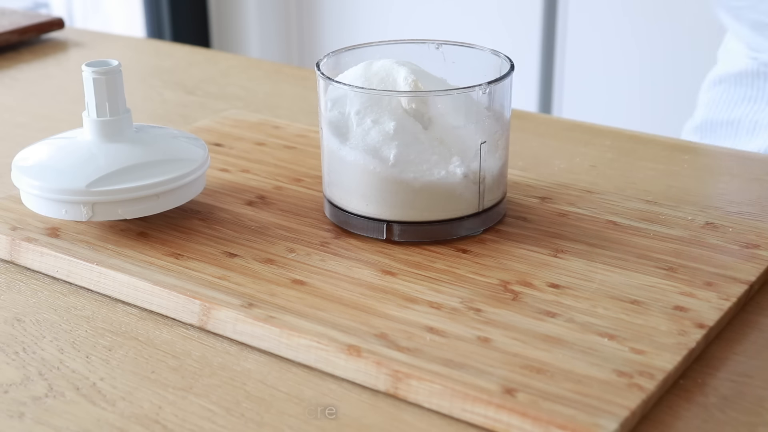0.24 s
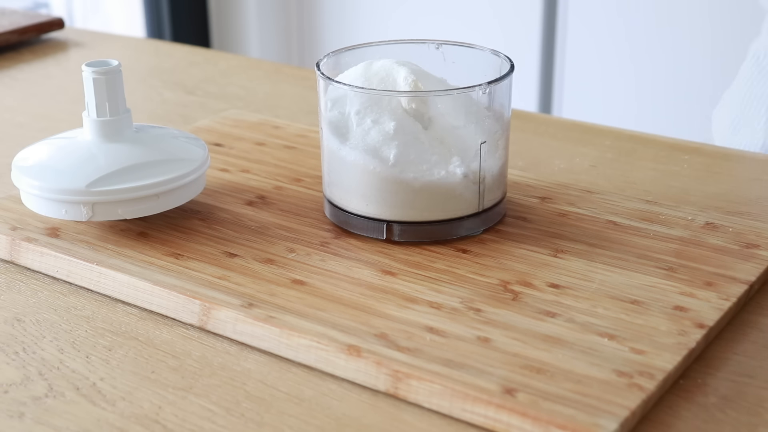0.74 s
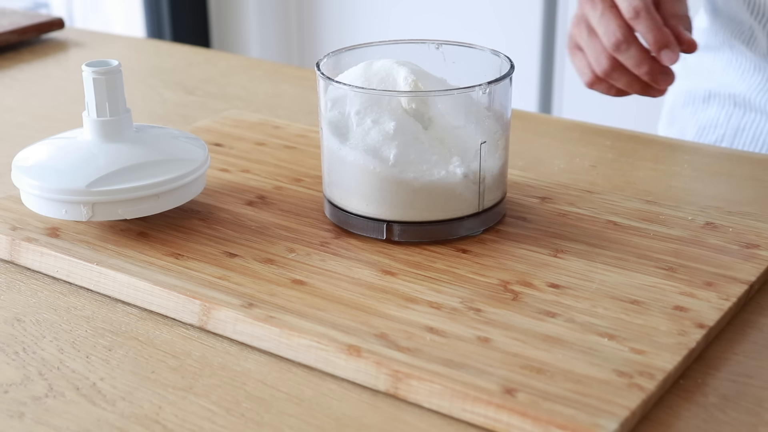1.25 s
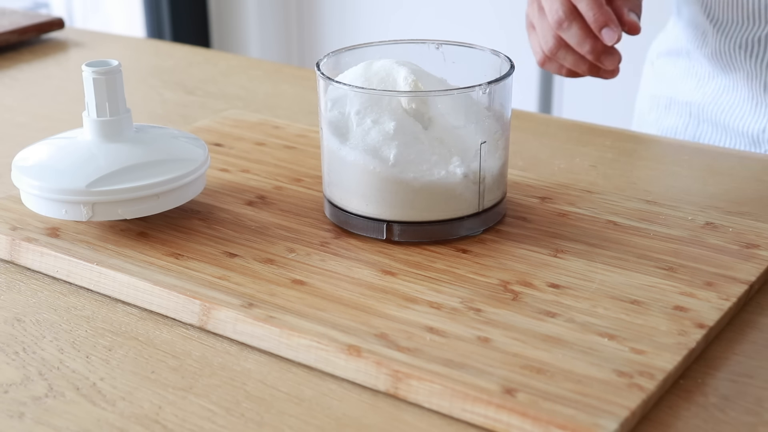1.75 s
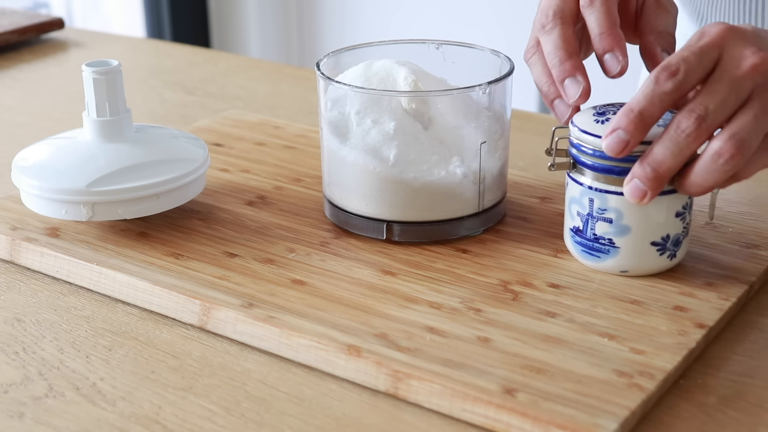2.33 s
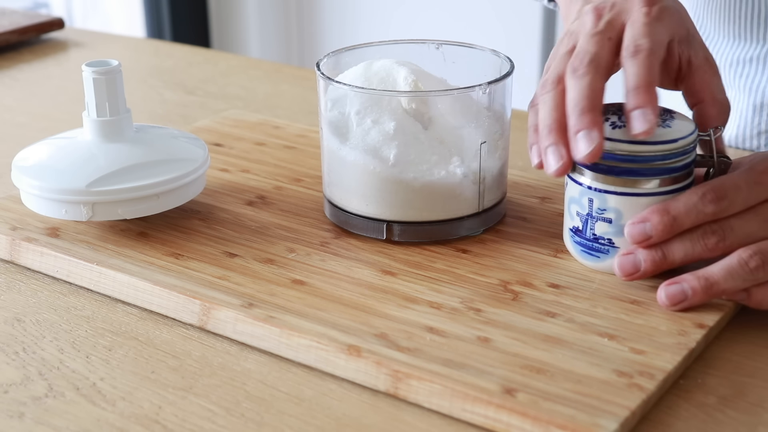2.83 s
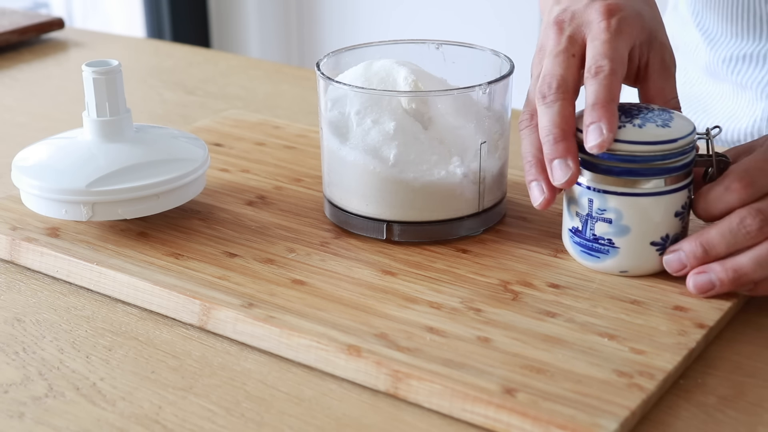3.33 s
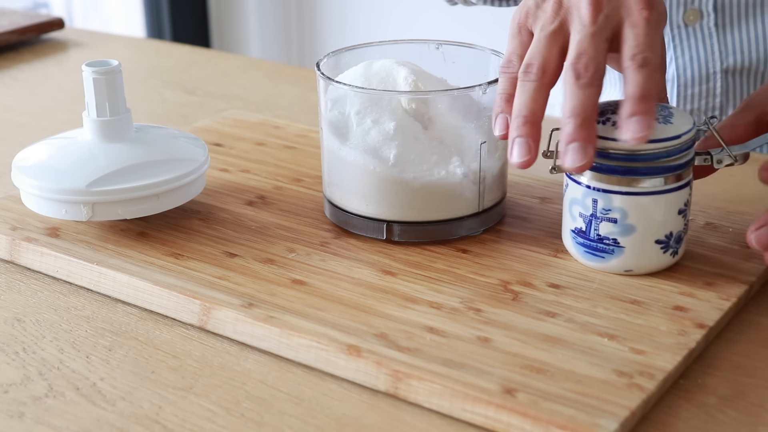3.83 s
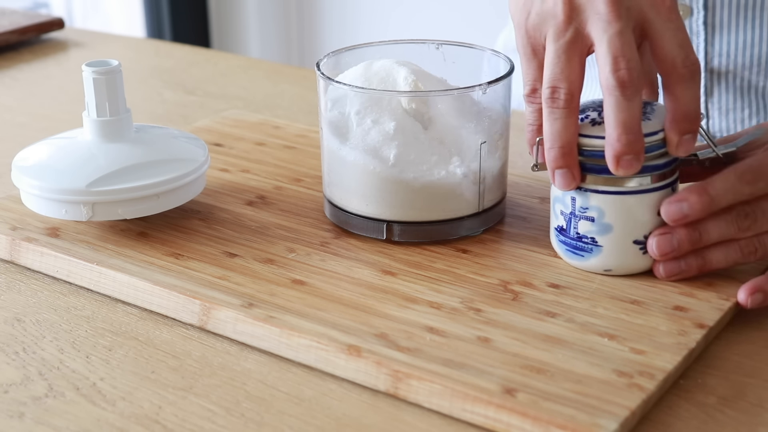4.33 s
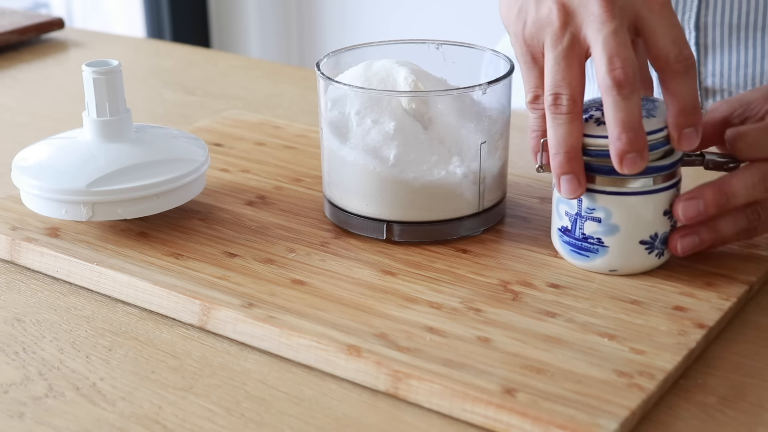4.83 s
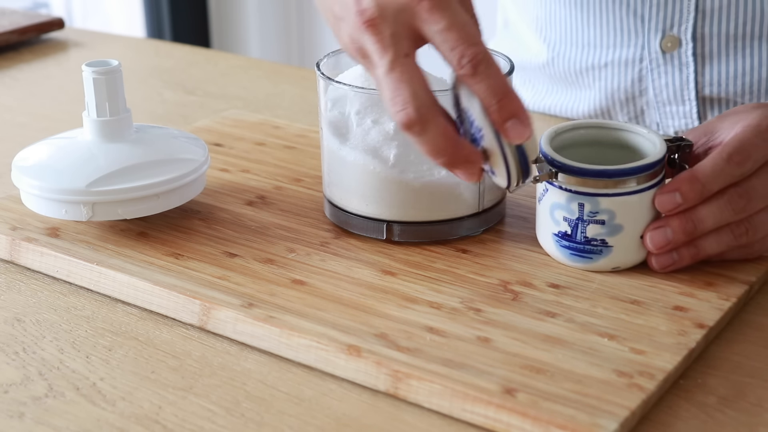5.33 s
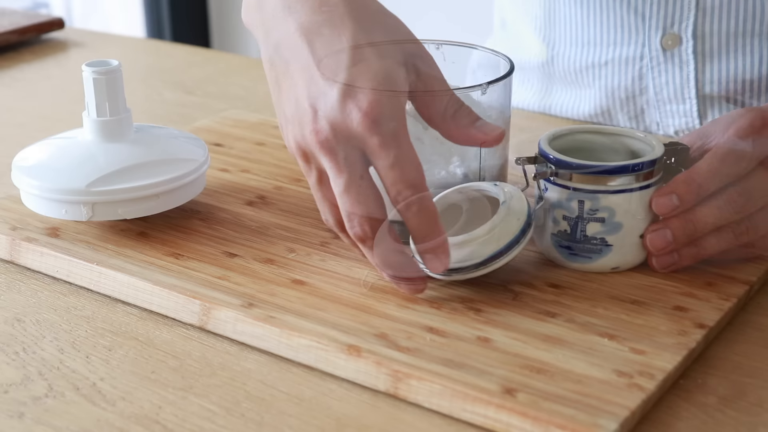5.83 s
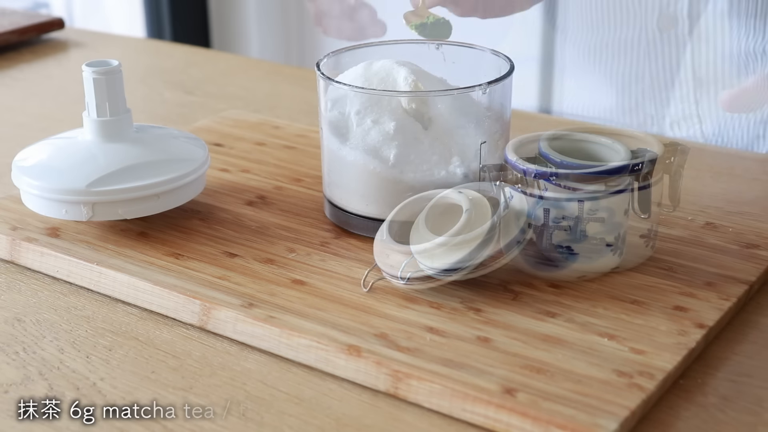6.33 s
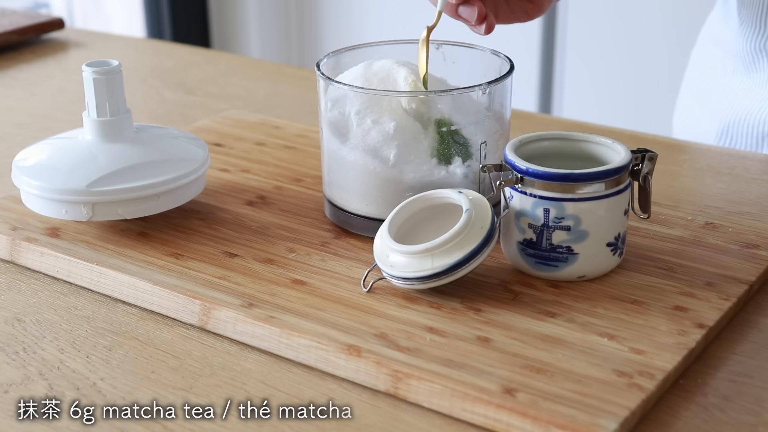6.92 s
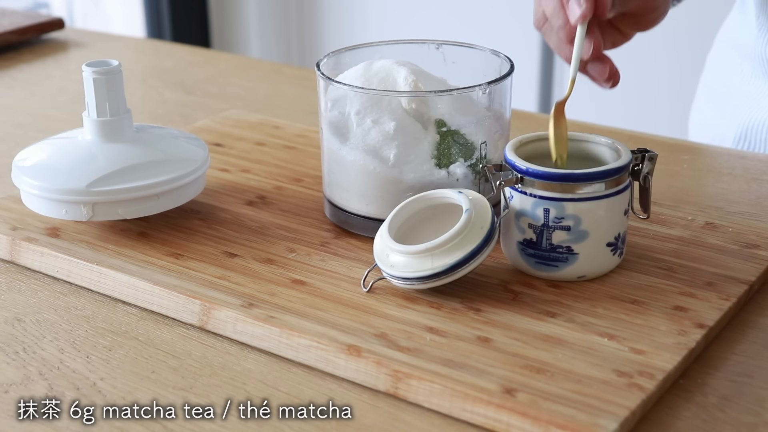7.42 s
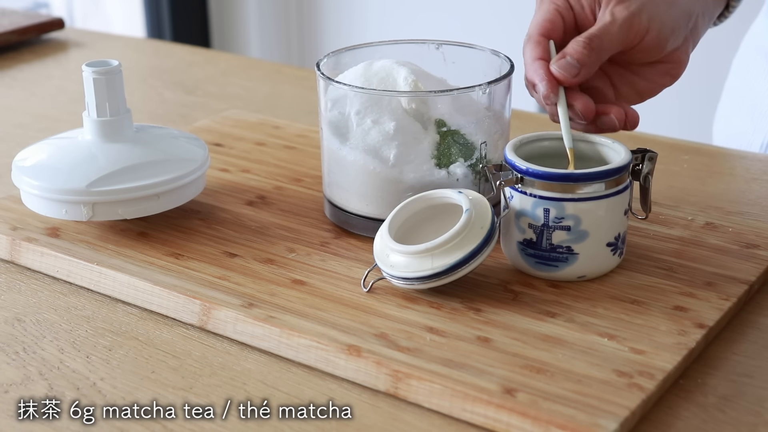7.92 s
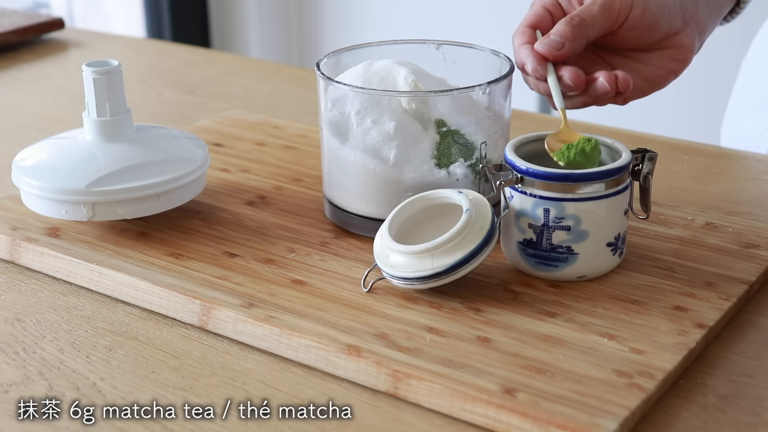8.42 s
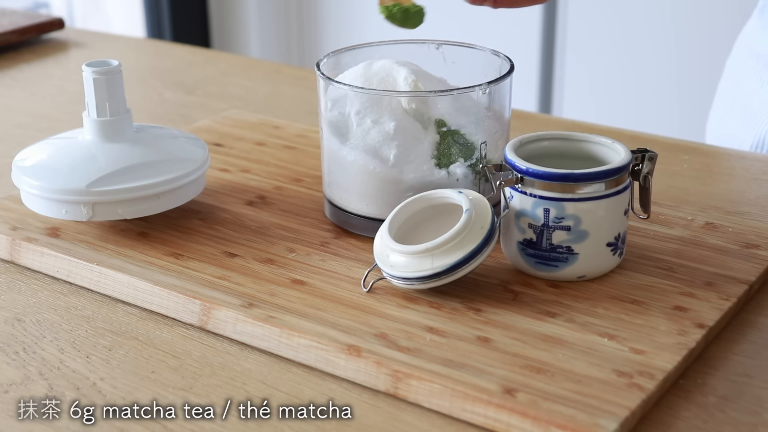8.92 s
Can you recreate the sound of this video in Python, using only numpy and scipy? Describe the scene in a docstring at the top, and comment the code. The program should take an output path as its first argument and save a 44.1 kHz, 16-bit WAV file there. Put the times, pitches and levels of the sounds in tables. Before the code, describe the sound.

Two hard booming knocks in a quiet kitchen with birdsong, then a wire-clasped ceramic jar clinks open on a wooden board and a spoon taps its rim.

```python
"""Soft hum, hiss and a brief rub of hands come first, then two hard knocks boom through a quiet kitchen.
A jar shifts on a wooden board, its wire clasp clinks and rattles, the lid is laid down, a spoon taps the rim.
Struck things are sums of dying tones with a crack of noise; the booms and the rubbing are shaped noise.
Birds outside the window are gliding sine tones, some roughened; hum and hiss are filtered noise.
A close pair of microphones hears it all, with room tails of fading noise behind the small sounds."""
import sys
import numpy as np
from scipy import signal
from scipy.fft import rfft, irfft
from scipy.io import wavfile
from scipy.ndimage import uniform_filter1d

SR = 44100
rng = np.random.default_rng(int(sys.argv[2]) if len(sys.argv) > 2 else 0)


def persist_wave(psi):
    """Save psi, clipped to +-1, as 16-bit WAV."""
    counts = np.round(np.clip(psi, -1, 1) * 32767).astype(np.int16)
    wavfile.write(sys.argv[1], SR, np.atleast_2d(counts).T)


def invert_db(x):
    """Field ratio 10**(x/20) for x, a level in decibels (scalar or array-like)."""
    u = np.asarray(x, float) / 20
    return 10 ** u


N = 403956
TIME = np.arange(N) / SR

# Levels in the tables are relative: pan, room, mix and limiter come later.
# colour of room tone and hiss: pitch_hz, level_db
AIR = [(12, -31.5), (20, -18.5), (49, -5.5), (96, -14), (135, -6.5), (237, -17), (323, -14.5), (361, -19),
       (652, -20.5), (729, -21), (794, -22), (863, -21.5), (8410, -35), (15200, -43), (16500, -55.5)]
# colour of the left-right difference in the hiss: pitch_hz, level_db
AIR_SIDE = [(60, -10), (110, -14), (200, -6.5), (380, -3.5), (700, -2.5), (1290, -2.5), (2380, -1),
            (4400, -0.5), (8120, -0.5), (15000, -1.5)]
# soft hums of the room: pitch_hz, level_db, width_hz
HUM = [(41.5, -66.5, 3.53), (133, -62, 44), (157.5, -73.5, 18)]
# time the room takes to die by 60 dB, before each source's stretch: pitch_hz, t60_s
ROOM_T60 = [(100, 0.8), (300, 0.5), (1000, 0.46), (3000, 0.39), (8000, 0.28), (16000, 0.13)]
# bird notes, each one straight glide: start_s, length_s, first_hz, last_hz, level_db
WHISTLES = [(3.09, 0.17, 4326, 4385, -62), (3.403, 0.17, 4317, 4240, -65.5),
            (3.51, 0.15, 6420, 6360, -59.5), (7.34, 0.15, 1915, 1487, -50.5),
            (7.571, 0.335, 2804, 2740, -54)]
WARBLES = [(1.78, 0.4, 1860, 1830, -52), (6.31, 0.23, 1877, 2060, -54), (6.86, 0.19, 2120, 2480, -54.5),
           (7.0, 0.21, 2470, 2464, -55.5), (7.26, 0.1, 1604, 1900, -52.5), (7.85, 0.11, 3250, 2910, -54.5),
           (8.48, 0.14, 6400, 6450, -64)]
BUZZES = [(2.54, 0.062, 3100, 3050, -52), (2.54, 0.063, 2070, 2030, -56), (2.66, 0.062, 2990, 2890, -53.5),
          (2.67, 0.047, 1990, 1950, -57), (2.96, 0.13, 6270, 6100, -57.5), (3.23, 0.18, 6130, 6040, -56),
          (6.93, 0.085, 2810, 2800, -52), (8.56, 0.16, 4650, 4740, -64.5)]
# swell of each kind of note: rise (share of the length), start_db, end_db
WHISTLE = (0.16, -6, -10)
WARBLE = (0.6, -6.5, -12)
BUZZ = (0.36, -11.5, -11)
# one leaping bird flourish: time_s, pitch_hz, level_db
FLOURISH = [(6.55, 1800, -63), (6.578, 1804, -49.5), (6.632, 1720, -53), (6.67, 2173, -45.5),
            (6.765, 1930, -48), (6.8, 1950, -69)]
# roughness of each kind of bird voice: kind, roughness (0-1)
ROUGH = {"whistle": .25, "warble": .5, "buzz": .8, "flourish": .1}
# hands rubbing and shifting things: start_s, length_s, level_db, treble_db
STROKES = [(-0.03, 0.094, -45.5, -25), (0.06, 0.34, -56.5, 0), (0.97, 0.18, -64.5, 6.5),
           (1.139, 0.13, -48, -34), (1.46, 0.19, -48.5, -24), (3.2, 0.26, -54.5, 0),
           (3.396, 0.19, -48.5, -21), (3.544, 0.15, -53.5, 0.5), (3.74, 0.14, -49.5, -8),
           (3.858, 0.23, -48, -28), (4.07, 0.15, -47, -16), (4.397, 0.2, -56.5, -4),
           (4.602, 0.13, -54, -1.5), (4.876, 0.31, -50, -14), (7.884, 0.091, -52, -2.5)]
# the loose lever of the clasp rattles: start_s, length_s, level_db
RATTLES = [(3.75, .11, -45), (4.009, .15, -45.5), (4.31, .08, -44.5), (4.635, .15, -44.5),
           (4.89, .19, -45.5), (5.19, .12, -37.5)]
# ring of clasp wire and glazed rim, before damping: pitch_hz, level_db, t60_s
WIRE = [(2663, -10.5, 0.2), (2965, -4.5, 0.17), (3125, -5, 0.11), (3490, -8, 0.06), (3910, -13.5, 0.16),
        (5080, -11.5, 0.092), (5900, -19, .06), (6730, -9.5, 0.24), (7930, -1, 0.076), (8400, -21, 0.32),
        (8710, -13, 0.22), (9940, -2.5, 0.46), (10500, -8.5, 0.13), (11850, -14, 0.12), (11900, -9, 0.16),
        (13460, -9, 0.073), (14230, -17, .2), (15100, -25, 0.089), (15210, -7.5, 0.13)]
# the clasp strikes itself or the glaze: start_s, level_db, brightest_hz, click_db, damping by fingers (0-1)
CLINKS = [(3.694, -18, 7800, 1, 0.87), (3.793, -33.5, 2950, -2, 0.2), (3.8393, -32, 2770, 1, 0.65),
          (4.0188, -40, 3280, 5, 0.45), (4.0496, -40, 3040, 5, 0.4), (4.121, -40.5, 3050, -2, 0.4),
          (4.2977, -19, 9400, 1.5, 0.85), (4.6944, -31, 7700, -17, 0.9), (4.7102, -25.5, 7500, -6.5, 0.68),
          (4.7326, -22, 7800, -8, 0.84), (4.8828, -23.5, 2980, -14.5, 0.87), (4.8994, -40, 2750, 0, 0.7),
          (4.9194, -31, 9950, -8, 0.6), (4.933, -25, 10100, -11, 0.9), (4.9752, -36, 2780, -17, 0.94),
          (5.049, -42.5, 3860, -8, 0.4), (5.186, -31, 3150, 4.5, 0.47), (5.2113, -30, 3140, -1, 0.65),
          (5.218, -9.5, 9940, -18, 0.24), (5.2253, -10.5, 11800, -3, 0.67), (5.8682, -27, 3820, -7, 0.7)]
# slowest tones of the board: pitch_hz, level_db, t60_s
BOARD = [(122, -2.5, 0.16), (176.5, 2, 0.15), (212, -3.5, 0.25), (275, 7, 0.029)]
# what meets the board or rim: body, centre_hz of its cluster of tones, fall_db beside the centre
BODIES = {"finger": (1500, 5), "jar": (780, 4.6), "lid": (913, 14.4), "mouth": (1100, 32),
          "spoon": (1010, 12.8)}
# contacts: body, start_s, level_db, thump_db of the board, glaze_db, crack_db
CONTACTS = [("finger", 0.98, -41, -5, -19, -26), ("jar", 1.6, -40.5, 4.8, -5, -22),
            ("finger", 1.523, -39, 3, 4, -22), ("jar", 3.421, -34, -8, -1, -24),
            ("jar", 3.696, -14, -12, -8.5, -17), ("jar", 4.297, -24.5, -7.5, -8, -25),
            ("jar", 4.696, -32, -14, -9, -14), ("jar", 4.882, -33, -9, -10, 1),
            ("jar", 4.943, -38.5, -22, -13, -20), ("lid", 5.213, -28.5, -30, -7, -2),
            ("lid", 5.479, -11.5, -15, -17.5, -57), ("lid", 5.695, -38.5, 2, -8, -10),
            ("lid", 5.8685, -16, -6.5, -7.5, 5.2), ("mouth", 7.849, -26, -10, -30, -39),
            ("mouth", 7.887, -29.5, -16, -25, -34), ("spoon", 8.16, -18.5, -6, 3.3, 0),
            ("spoon", 8.317, -21, -7, 8, -2)]
# the spoon's own ring: pitch_hz, level_db, t60_s
SPOON = [(3300, -5, .05), (4500, -14, .05), (7380, 0, .04), (7900, 0.5, .06), (8850, -2, 0.036)]
# two heavy knocks: start_s, level_db, ring_hz, crack_db, room_db
KNOCKS = [(.4162, -1.5, 1353, -13, -12.5), (2.2488, -0.06, 1696, -18, -15)]
# colour of the roar after each knock, one list per knock: pitch_hz, level_db
KNOCK_BODY = [
    [(80, -24), (150, -11), (230, -4.5), (420, -4.5), (650, -1.5), (1350, -2.5), (2000, -9), (2700, -19),
     (3600, -30.5), (4600, -40.5), (7000, -69)],
    [(80, -19), (150, 0), (300, -0.5), (550, -5.5), (900, -5), (1350, -4.5), (2100, -9.5), (3000, -21),
     (4100, -30.5), (4800, -44.5), (7000, -71)],
]

CLASP_LAG = 1.8  # samples by which the left microphone hears the clasp late
SIDES = np.array([[1], [-1]])  # a difference signal enters left and right with opposite signs


def level(x, db):
    """Scale to an rms level."""
    return x * invert_db(db) / np.sqrt(np.mean(x ** 2))


def along_hz(table, hz):
    """Read (Hz, value) points on a log-frequency axis."""
    f, v = np.transpose(table)
    return np.interp(np.log(np.maximum(hz, 1)), np.log(f), v)


def colour(x, table):
    """Shape the spectrum by (Hz, dB) points."""
    hz = np.fft.rfftfreq(x.shape[-1], 1 / SR)
    return irfft(rfft(x) * invert_db(along_hz(table, hz)), x.shape[-1])


def band(x, lo_hz, hi_hz):
    """Keep the sound between two pitches (Butterworth band-pass)."""
    sos = signal.butter(2, [lo_hz, min(hi_hz, .45 * SR)], "band", fs=SR, output="sos")
    return signal.sosfilt(sos, x)


def walk(rate):
    """Smoothly wandering chance with a spread of 1; a higher rate wanders faster."""
    k = int(SR / rate)
    w = uniform_filter1d(uniform_filter1d(rng.standard_normal(N), k), k)
    return w / w.std()


def add(track, s, sound):
    """Mix a sound into a track at a time."""
    i = int(s * SR)
    track[..., i:i + sound.shape[-1]] += sound[..., :track.shape[-1] - i]


def dying(t, t60):
    """A fade that loses 60 dB in t60 seconds."""
    return np.exp(-np.log(1000) * t / t60)


def ring(hz, db, t60, push_s, count=1):
    """Dying tones struck by a short smooth push; each group of count tones shares a random sign."""
    t = TIME[:SR // 2]
    sign = np.repeat(np.sign(rng.standard_normal(len(hz) // count)), count)
    tones = np.sin(2 * np.pi * np.outer(hz, t)) * dying(t, t60[:, None])
    sound = (sign * invert_db(db)) @ tones
    sound = np.convolve(sound, np.hanning(int(push_s * SR) + 3))[:len(t)]
    # even out the strength of the first 10 ms
    return sound / np.sqrt(8 * np.mean(sound[:SR // 100] ** 2))


def crack(lo_hz, hi_hz, t60):
    """A short dying burst of contact noise, filtered twice for steep edges, peak 1."""
    t = TIME[:2048]
    noise = rng.standard_normal(len(t)) * dying(t, t60)
    sound = band(band(noise, lo_hz, hi_hz), lo_hz, hi_hz)
    return sound / np.abs(sound).max()


def pair(x, lag, pan_db):
    """Two microphones: the left hears the sound lag samples later and pan_db louder."""
    lags = lag * np.array([[1], [0]])
    turn = np.exp(-2j * np.pi * np.fft.rfftfreq(len(x)) * lags)
    return irfft(rfft(x) * turn, len(x)) * invert_db(SIDES * pan_db / 2)


def room(x, stretch=0.99, rise_s=0.0025):
    """Room tail: octave bands of noise, each dying at its own rate; the bass is more alike left and right."""
    alike_hz = 756.0  # below this the two sides grow alike
    t, tail = TIME[:SR], 0
    for hz in 90 * 2. ** np.arange(8):
        mid, side = band(rng.standard_normal((2, SR)), hz / np.sqrt(2), hz * np.sqrt(2))
        t60 = stretch * along_hz(ROOM_T60, hz)
        tail = tail + (mid + min(hz / alike_hz, 1) * side * SIDES) * dying(t, t60)
    tail = tail * (1 - np.exp(-t / rise_s))
    tail = tail / np.sqrt(np.sum(tail ** 2) / 2)
    return signal.fftconvolve(x[None], tail, axes=1)[:, :N]


def air():
    """Room tone and microphone hiss as coloured noise, with a few wavering hums as narrow noise bands."""
    mid, side = colour(rng.standard_normal((2, N)), AIR)
    hiss = level(mid + colour(side, AIR_SIDE) * SIDES, -50.5)
    hiss = hiss * invert_db(0.15 * walk(4.5))
    hum = 0
    for hz, db, width in HUM:
        hum = hum + level(band(rng.standard_normal(N), hz - width / 2, hz + width / 2), db)
    return hiss + hum * invert_db(0.88 * walk(0.76))


def phrases():
    """Every bird note as points of time, pitch and level, with its roughness 0-1."""
    song = [(*np.transpose(FLOURISH), ROUGH["flourish"])]
    kinds = (("whistle", WHISTLES, WHISTLE), ("warble", WARBLES, WARBLE), ("buzz", BUZZES, BUZZ))
    for kind, notes, (rise, start_db, end_db) in kinds:
        share = np.array([0, rise, 1])
        swell_db = np.array([start_db, 0, end_db])
        for s, length, first_hz, last_hz, db in notes:
            pitch_hz = first_hz + share * (last_hz - first_hz)
            song.append((s + share * length, pitch_hz, db + swell_db, ROUGH[kind]))
    return song


def birds():
    """Near-sine voices; a rough note is throbbed by a fast trill and smeared by flutter."""
    out = np.zeros(N)
    flutter, waver = walk(480), walk(370)
    trill_hz = 36. + 7.3 * walk(3.7)
    trill = np.sin(2 * np.pi * np.cumsum(trill_hz) / SR)
    for s, hz, db, rough in phrases():
        i = slice(int(s[0] * SR), int(s[-1] * SR))
        wobble_hz = 209.0 * rough ** 2 * (waver[i] + 1.1 * trill[i])
        pitch = np.interp(TIME[i], s, hz) + wobble_hz
        steady = np.sqrt(1 - rough ** 2) * (1 + 0.64 * rough * trill[i])
        size = steady + rough ** 2 * flutter[i]
        edges = signal.windows.tukey(len(pitch), .15)
        loudness = np.sqrt(2) * invert_db(np.interp(TIME[i], s, db))
        out[i] += loudness * size * edges * np.sin(2 * np.pi * np.cumsum(pitch) / SR)
    return invert_db(5.5) * pair(out, .3, 0.56) + invert_db(-5.0) * room(out, stretch=1.1, rise_s=0.015)


def hands():
    """Skin and glaze sliding: grainy noise in a low and a high band, swelling and fading in each stroke."""
    rise, edge_db, fade_s = 0.37, -9, 0.04  # share spent swelling; level at both ends; fade beyond them
    grain_db = 1.75 * np.minimum(rng.exponential(size=N), 6.)
    grains = invert_db(grain_db) * rng.standard_normal(N)
    low = level(band(grains, 120.0, 1440.0), 0)
    high = level(band(grains, 2130.0, 4170.0), 0)
    out = np.zeros(N)
    for s, length, db, treble_db in STROKES:
        points_s = [-fade_s, 0, rise * length, length, length + fade_s]
        swell_db = np.interp(TIME - s, points_s, [-50, edge_db, 0, edge_db, -50], -90, -90)
        out += invert_db(db + swell_db) * (low + invert_db(treble_db) * high)
    return pair(out, 0.71, 1.0) + invert_db(-3.5) * room(out, stretch=1.0)


def rattle():
    """Tiny uneven ticks of the loose lever ring the low tones of the wire."""
    ticks_per_s, scatter_db = 130, 4.
    ticks = (rng.random(N) < ticks_per_s / SR) * invert_db(scatter_db * rng.standard_normal(N))
    gate = np.zeros(N)
    for s, length, db in RATTLES:
        gate += invert_db(db) * np.sin(np.pi * np.clip((TIME - s) / length, 0, 1)) ** .5
    hz, db, t60 = np.transpose([mode for mode in WIRE if mode[0] < 4500])
    out = signal.fftconvolve(ticks * gate, ring(hz, db, 0.26 * t60, 0.))[:N]
    return pair(out, CLASP_LAG, -1.0) + invert_db(-5.5) * room(out)


def clasp(count=4):
    """Thin steel wire: the same groups of count close tones, damped by the fingers, with one small rebound."""
    grip_spread_hz = 66  # a firm grip smears every tone
    dry, near = np.zeros(N), np.zeros((2, N))
    hz, db, t60 = np.repeat(WIRE, count, axis=0).T
    spread_hz = np.where(hz < 4500, 110., 4.)  # the loose lever smears the low tones
    chance = rng.standard_normal((len(CLINKS), 3, len(hz)))
    for (s, peak_db, bright_hz, click_db, damping), c in zip(CLINKS, chance):
        off_bright_db = -6 * np.abs(np.log2(hz / bright_hz))
        weight_db = db + off_bright_db + 4 * np.repeat(c[0, ::count], count)
        struck_hz = hz + (spread_hz + grip_spread_hz * damping ** 2) * c[1]
        sound = ring(struck_hz, weight_db, t60 * (1 - damping), 0., count=count)
        sound[:2048] += invert_db(click_db) * crack(1630.0, 15000.0, 0.012)
        rebound_s = 0.0053 + 0.0024 * np.tanh(c[2, 0])
        add(sound, rebound_s, invert_db(-7.5) * sound.copy())
        add(dry, s, invert_db(peak_db) * sound)
        add(near, s, invert_db(peak_db) * pair(sound, CLASP_LAG, -4.5))
    return near + invert_db(-5) * room(dry, stretch=1.23)


def taps(count=140):
    """The board thumps; a crowd of short tones of wood and glaze clusters round each body's centre."""
    spoon_db, spoon_spread_hz, tick_db = -12, 225, -10.5  # held in the fingers, each tone smears into a group
    dry = np.zeros(N)
    low_hz, low_db, low_t60 = np.transpose(BOARD)
    ring_hz, ring_db, ring_t60 = np.repeat(SPOON, 4, axis=0).T
    chance = rng.standard_normal((len(CONTACTS), 2, count))
    for (body, s, peak_db, thump_db, glaze_db, crack_db), c in zip(CONTACTS, chance):
        centre_hz, fall_db = BODIES[body]
        hz = np.geomspace(320, 12000, count) * (1 + 0.015 * c[0])
        shape = [(centre_hz / 1.77, -fall_db), (centre_hz / 1.07, 0), (centre_hz * 1.11, 0),
                 (centre_hz * 1.27, -.45 * fall_db), (2200, glaze_db), (3300, glaze_db - 4.0),
                 (5200, crack_db), (8300, crack_db - 9.5), (11000, crack_db - 24)]
        db = along_hz(shape, hz) + 2 * c[1]
        t60 = 0.048 * (hz / 1000) ** -.45  # higher tones die sooner
        thump = ring(low_hz, low_db, low_t60, 0.00077)
        sound = ring(hz, db, t60, .0001) + invert_db(thump_db + 1.5) * thump
        if body == "spoon":
            smeared_hz = ring_hz + spoon_spread_hz * c[0, :len(ring_hz)]
            sound += invert_db(spoon_db) * ring(smeared_hz, ring_db, ring_t60, 0.)
            sound[:2048] += invert_db(tick_db) * crack(2700.0, 15500.0, 0.013)
        add(dry, s, invert_db(peak_db) * sound)
    return pair(dry, 0.58, 1.3) + invert_db(-2.5) * room(dry)


def knocks():
    """A sharp ring of a few cycles, then a dull roar of noise through the rooms that a far wall renews once."""
    echo_s, echo_db, roar_t60_s = 0.091, -12.5, 0.42
    dry, out, t = np.zeros(N), np.zeros((2, N)), TIME[:SR]
    swell = (1 - np.exp(-t / 0.0016)) * dying(t, roar_t60_s)
    echo_rise = np.exp(np.minimum(t - echo_s, 0) / 0.02)
    echo = echo_rise * dying(np.maximum(t - echo_s, 0), 0.54)
    ratios = np.array([.19, .55, 1., 1.45, 2.1])  # tones of the blow as multiples of its ring
    tone_db = np.array([-18.5, -11.5, -6.5, -6.0, -9.5])
    tone_t60 = np.array([.03, .02, 0.017, 0.01, 0.0082])
    for (s, db, hz, crack_db, room_db), body in zip(KNOCKS, KNOCK_BODY):
        blow = ring(hz * ratios, tone_db, tone_t60, 0.00021)
        add(dry, s, invert_db(db) * blow)
        add(dry, s, invert_db(db + crack_db) * crack(2050.0, 8000., 0.016))
        mid, side = colour(rng.standard_normal((2, SR)), body)
        side = band(side, 780.0, 8000.) * invert_db(-2.0)
        roar = level(mid + side * SIDES, db + room_db)
        add(out, s, roar * (swell + invert_db(echo_db) * echo))
    return out + pair(dry, 2.15, -0.87)


def scene():
    """Knocks and things on the board, with birds and room tone behind them."""
    near = hands() + rattle() + clasp() + taps() + knocks()
    # thin out the deep bass of the near sounds
    no_bass = signal.butter(3, 95., "high", fs=SR, output="sos")
    return air() + birds() + signal.sosfilt(no_bass, near)


def roll_off(x):
    """The treble ends steeply here."""
    return signal.sosfilt(signal.butter(12, 16670, fs=SR, output="sos"), x)


def record(dry):
    """A limiter ducks after loud sounds and recovers slowly; the highest peaks clip."""
    fall = np.exp(-1 / (.25 * SR))  # power is averaged over about 0.25 s
    power = signal.lfilter([1 - fall], [1, -fall], np.mean(dry ** 2, axis=0))
    gain = (1 + power / invert_db(-20) ** 2) ** -.12
    mix = np.clip(dry * gain, -1, 1)
    return roll_off(mix)


dry = scene()
out = record(dry)
persist_wave(out)
```